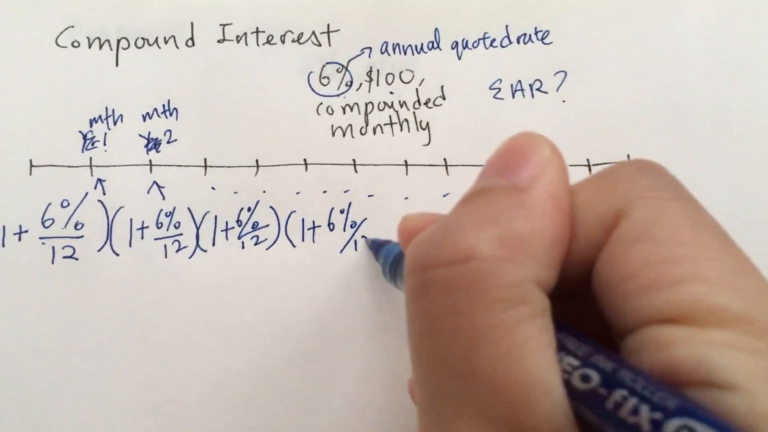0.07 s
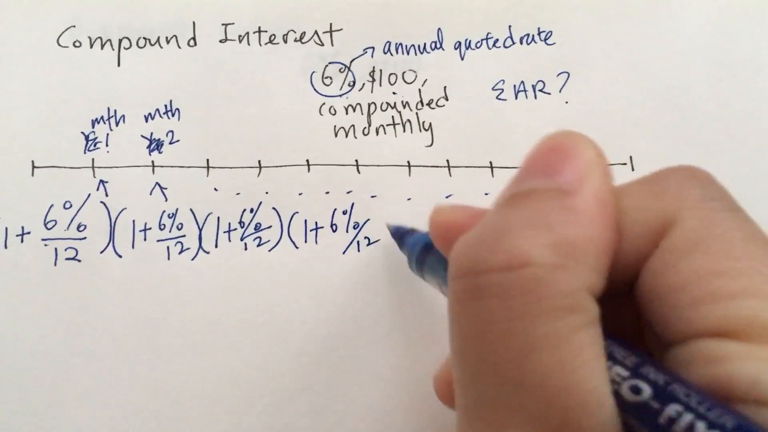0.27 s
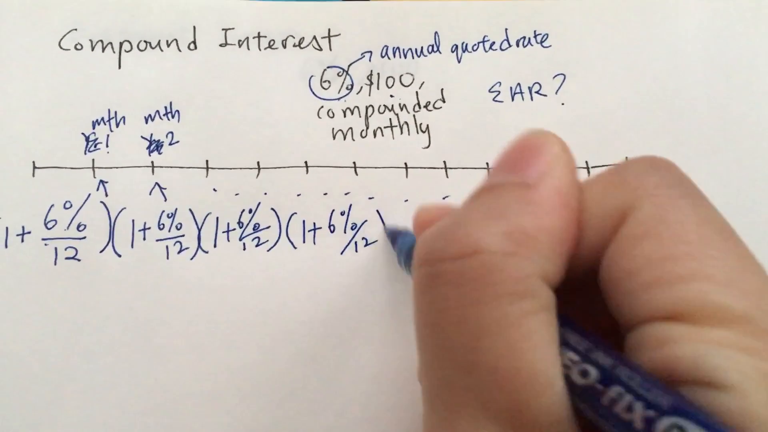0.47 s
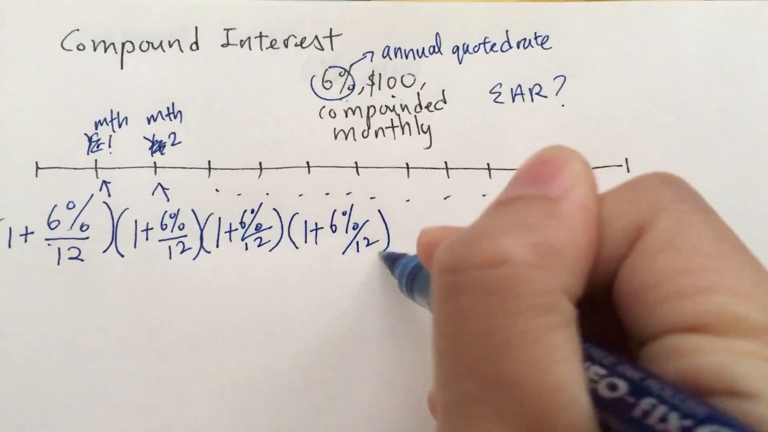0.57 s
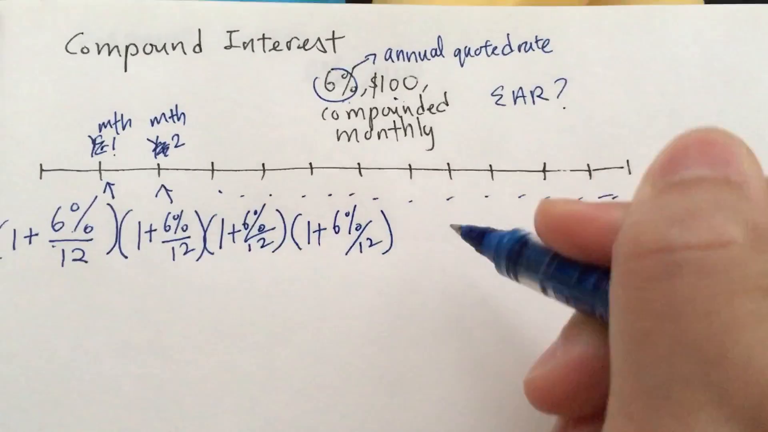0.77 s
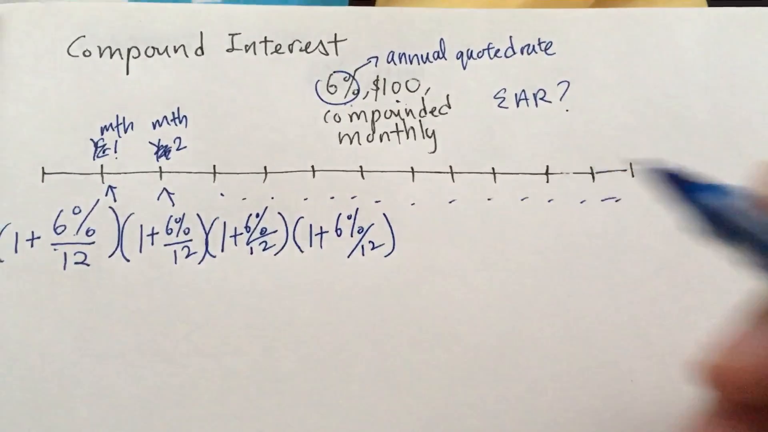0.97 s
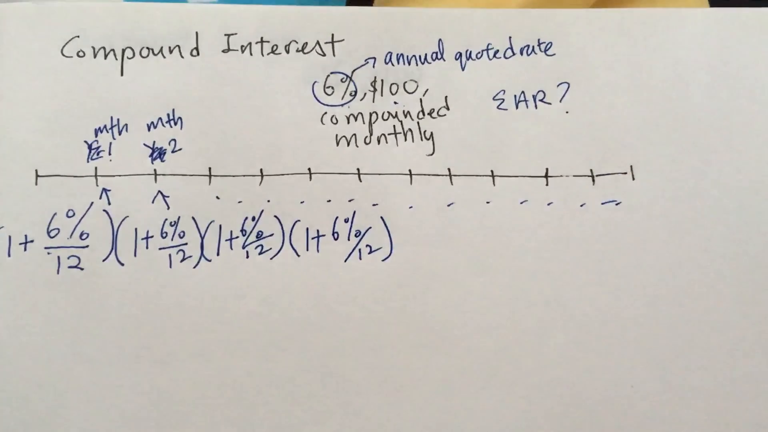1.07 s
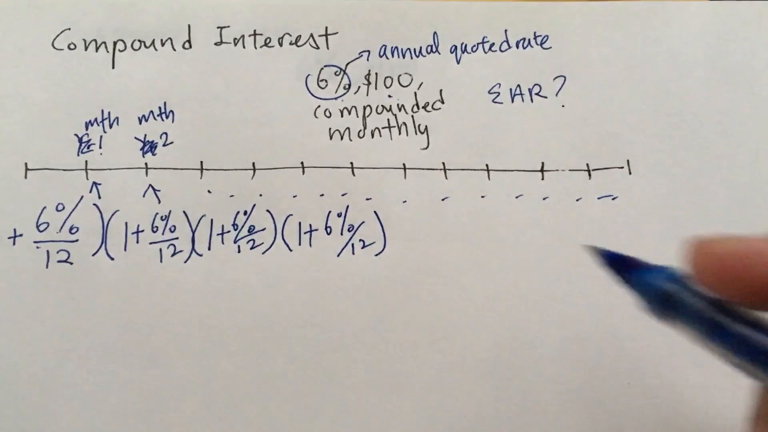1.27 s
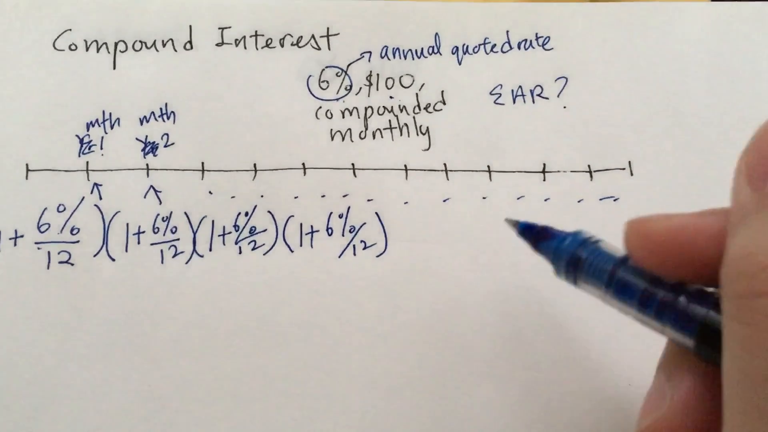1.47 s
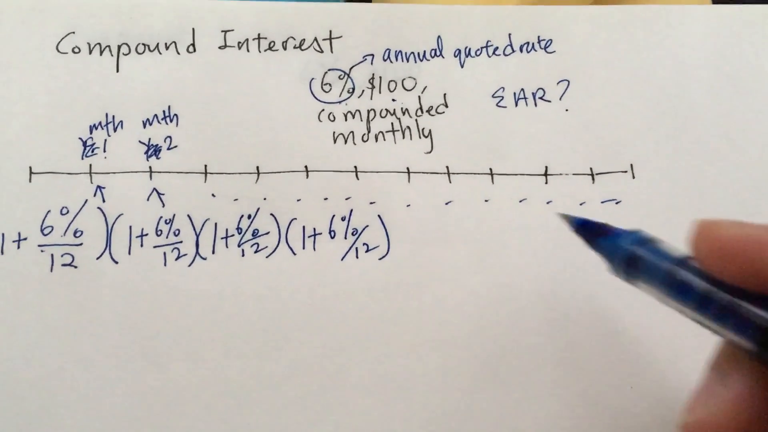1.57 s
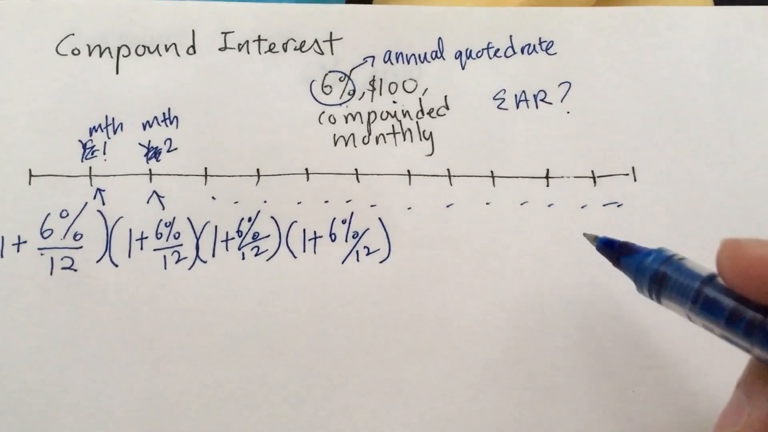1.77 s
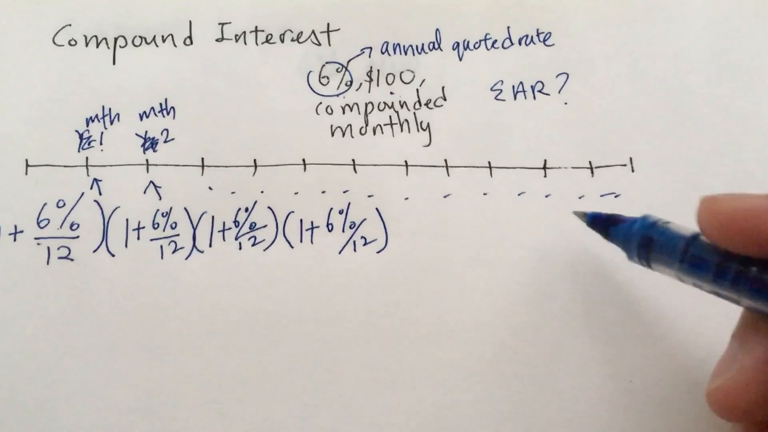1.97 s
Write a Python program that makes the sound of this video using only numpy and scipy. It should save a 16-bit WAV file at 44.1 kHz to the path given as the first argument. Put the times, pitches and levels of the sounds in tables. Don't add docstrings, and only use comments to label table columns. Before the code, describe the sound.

A fine pen writes on paper on a desk, heard close: faint short scratches from 0 to 0.35 s, then a bright tick at 0.45 and the hardest, shrillest stroke around 0.5-0.65. From 0.7 to 2 s the hand slides off in soft hissing brushes, with dull wrist bumps near 0.9 and tiny ticks around 1.1, 1.3 and 1.5. Low machine hum and airy ventilation continue throughout.

```python
import sys
import numpy as np
from scipy import signal
from scipy.fft import rfft, irfft
from scipy.io import wavfile
from scipy.ndimage import uniform_filter1d

SR = 44100
rng = np.random.default_rng(int(sys.argv[2]) if len(sys.argv) > 2 else 0)


def nominal_scale(level):
    x = np.asarray(level, float) / 20
    return 10 ** x


def to_wav(sig):
    pcm = np.clip(np.atleast_2d(sig), -1, 1) * 32767
    pcm = np.round(pcm).astype(np.int16)
    wavfile.write(sys.argv[1], SR, pcm.T)


N = 88905

# start in seconds, length in seconds, level in dB, desk drum in dB, edge hiss in dB.
PEN_STROKES = [
    (-.04, 0.062, -67, 12, -3.5),
    (0.088, 0.014, -72, 5, -13),
    (0.144, 0.042, -68.5, 5.5, -7.5),
    (0.16, 0.074, -67, 6, -15),
    (0.265, 0.067, -63, -6, -9),
    (0.303, 0.099, -74, -10, -16),
    (0.496, 0.042, -62, 2.5, -25),
    (.508, 0.064, -51.5, 0, -18),
    (.545, .06, -56, 3.5, -15),
    (0.569, 0.096, -64.5, 1, -6.5),
]
# centre in Hz, width in Hz, level in dB.
TIP_RESONANCES = [(3590, 890, -8), (4650, 500, -13.5), (6120, 1570, -2.5), (6870, 720, -1),
                  (7970, 1600, -3.5)]
# centre in Hz, width in Hz, level in dB.
EDGE_HISS = [(9400, 3300, 0), (11000, 2000, 0)]
# centre in Hz, width in Hz, level in dB.
SHRILL_BANDS = [(11600, 1600, -1), (13600, 1400, -11), (15000, 1500, -13)]
# centre in Hz, width in Hz, level in dB.
DESK_MODES = [(692, 98, -0.5), (818, 78, -1.5), (898, 56, -0.5), (1440, 1700, -13), (2000, 770, -11.5)]
# pitch in Hz, rms level in dB.
MACHINES = [(46.8, -45.6), (48.55, -55)]
# frequency in Hz, level in dB per Hz.
RUMBLE_COLOUR = [(22, -16.5), (35, -13), (47, -2), (62, 7), (90, 1.5), (115, -11.5), (160, -5.5),
                 (340, -5.5)]
# frequency in Hz, level in dB per Hz.
AIR_COLOUR = [(290, -28), (500, -3.5), (1040, -8), (2050, -11.5), (2240, -13), (3210, -18.5), (5020, -24),
              (8200, -25.5), (15700, -32.5)]
# centre in Hz, width in Hz, rms level in dB.
DUCT_MODES = [(89, 24, -65.5), (146.8, 10.2, -69.5), (172, 6.5, -70.5), (222.3, 16, -75), (331, 38, -73),
              (395.5, 14, -75), (580.7, 10, -79.5), (824, 14.3, -81)]
# middle in seconds, low edge in Hz, high edge in Hz, level in dB.
WIDE_HISS = [
    (.047, 8800, 10300, -86),
    (.047, 12300, 15200, -84),
    (.768, 5000, 6400, -70),
    (.768, 8800, 11700, -70),
    (.768, 13800, 15700, -76),
]
# time in seconds, peak in dB, top of its band in Hz.
TIP_TOUCHES = [
    (0.454, -43.5, 13500),
    (.192, -56, 10000),
    (.602, -52, 11000),
    (1.098, -54, 10000),
    (1.132, -52, 10000),
    (1.326, -52, 10500),
    (1.539, -48, 9000),
]
# time in seconds, pitch in Hz, level in dB, T60 in seconds.
WRIST_BUMPS = [
    (1.999, 522, -48.5, 0.24),
    (.88, 460, -59, .2),
    (.87, 109.5, -47.5, .25),
    (0.42, 148, -54.5, 0.36),
    (.93, 89, -52, .25),
    (1.27, 260, -58, 0.25),
    (2.5, 165, -59, .3),
]
# start in seconds, length in seconds, level in dB, high and low sheet ring in dB.
HAND_SLIDES = [(0.694, 0.16, -61, -0.5, -8), (0.748, 0.2, -65.5, -13, -10), (0.864, 0.1, -63, -3, -7.5),
               (0.902, .13, -62, -11, -9), (0.984, 0.18, -72, -22, -25), (1.065, 0.18, -65, -15, -9),
               (1.136, 0.22, -72.5, -14, -7), (1.242, 0.19, -64.5, -8.5, -2), (1.29, 0.25, -59.5, -17, -26),
               (1.545, 0.16, -64, -7.5, -4.5), (1.633, 0.15, -65.5, -5.5, -0.5),
               (1.767, 0.21, -74.5, -20, -8), (1.851, 0.23, -67.5, -15, -10)]
# start in seconds, length in seconds, level in dB.
PALM_RUBS = [
    (0.692, 0.2, -71),
    (0.882, 0.15, -70.5),
    (1.27, 0.23, -65),
    (1.407, 0.18, -69.5),
    (1.594, 0.18, -71),
    (1.893, 0.17, -77),
]
# start in seconds, length in seconds, level in dB.
FINGER_TRAILS = [
    (0.79, .13, -72),
    (.94, .14, -71),
    (1.028, 0.13, -72.5),
    (1.08, 0.16, -68.5),
    (1.3, 0.12, -75),
    (1.842, 0.19, -77),
]
# frequency in Hz, level in dB per Hz.
SKIN_COLOUR = [(1650, -31), (2800, -11.5), (3740, -2.5), (5090, -0.5), (6800, -4), (7250, -4.5), (8680, 0),
               (10200, -3.5), (15700, -11)]
# centre in Hz, width in Hz, level in dB.
HIGH_SHEET_RING = [(6570, 820, 15), (5600, 410, 0)]
# centre in Hz, width in Hz, level in dB.
LOW_SHEET_RING = [(3560, 680, 4), (4500, 230, 10.5)]
# centre in Hz, width in Hz, level in dB.
PALM_BANDS = [(2180, 540, -3.5), (1300, 600, -3.5)]
# centre in Hz, width in Hz, level in dB.
FINGERTIP_BANDS = [(8650, 2600, 1), (11200, 970, -6)]
# centre in Hz, width in Hz, depth from 0 to 1.
REFLECTION_DIPS = [(10400, 600, .45), (4950, 300, .25)]

STROKE_SHARPNESS, STROKE_SKEW = 1.4, 0.89
SLIDE_SHARPNESS, SLIDE_SKEW = 1.92, 0.88
PEN_FIBRES_PER_S, SKIN_FIBRES_PER_S = 9000, 16000
SHRILL_DB, SHRILL_POWER = -12, 1.2
TOUCH_T60_S, TOUCH_TAIL_DB, TOUCH_LOW_HZ = 0.035, -17, 3500
BUMP_RISE_S = 0.004
WIDE_HISS_S = 0.04
HUM_SWELL_S, HUM_WAVER_DB = 1.613, 0.5
RUMBLE_DB, AIR_DB = -56.5, -66
LOW_DUCT_FADE_DB_PER_S = -3
TOP_CUT_HZ = 16600


def rms_one(x):
    return x / np.sqrt(np.mean(x ** 2) + 1e-20)


def drift(rate):
    r = np.exp(-2 * np.pi * rate / SR)
    wander = signal.lfilter([1], [1, -2 * r, r * r], rng.standard_normal(N + SR))
    return rms_one(wander[SR:])


def coloured(x, points, edge_db=-24):
    first_hz, first_db = points[0]
    hz, db = np.transpose([(first_hz * 0.23, first_db + edge_db), *points])
    f = np.maximum(np.fft.rfftfreq(len(x), 1 / SR), 1)
    gain = nominal_scale(np.interp(np.log(f), np.log(hz), db, right=-90))
    return rms_one(irfft(rfft(x) * gain, len(x)))


def resonant(x, peaks):
    out = 0
    for k, (hz, width, db) in enumerate(peaks):
        r = np.exp(-np.pi * width / SR)
        zeros = np.array([1, 0, -1]) * (1 - r * r) / 2
        poles = [1, -2 * r * np.cos(2 * np.pi * hz / SR), r * r]
        out = out + (-1) ** k * nominal_scale(db) * signal.lfilter(zeros, poles, x)
    return out


def twice(x, peaks):
    out = 0
    for k, (hz, width, db) in enumerate(peaks):
        once = resonant(x, [(hz, width, db)])
        out = out + (-1) ** k * resonant(once, [(hz, width, 0)])
    return rms_one(out)


def bandpass(x, order, low_hz, high_hz):
    return signal.sosfilt(signal.butter(order, [low_hz, high_hz], "band", fs=SR, output="sos"), x)


def fibres(per_s, spread_db):
    size = nominal_scale(spread_db * np.minimum(rng.exponential(1, N), 5)) * rng.choice([-1, 1], N)
    return size * (rng.random(N) < per_s / SR) + 1e-18


def swell(start, length, sharpness, skew):
    share = np.clip((np.arange(N) / SR - start) / length, 0, 1)
    return np.sin(np.pi * share ** skew).clip(0) ** sharpness


def pen():
    tip, desk, edge = 0, 0, 0
    for start, length, db, desk_db, edge_db in PEN_STROKES:
        speed = nominal_scale(db) * swell(start, length, STROKE_SHARPNESS, STROKE_SKEW)
        tip = tip + speed
        desk = desk + nominal_scale(desk_db) * speed
        edge = edge + nominal_scale(edge_db) * speed
    catch = nominal_scale(1.6 * drift(300))
    grain = fibres(PEN_FIBRES_PER_S, 2.2) * catch
    other_grain = fibres(PEN_FIBRES_PER_S, 2.2) * catch
    shrill = nominal_scale(SHRILL_DB) * tip.max() * (tip / tip.max()) ** SHRILL_POWER
    scratch = tip * twice(grain, TIP_RESONANCES) + shrill * twice(grain, SHRILL_BANDS)
    drum = desk * rms_one(resonant(other_grain, DESK_MODES))
    return scratch + edge * twice(other_grain, EDGE_HISS) + drum


def hum():
    t = np.arange(N) / SR - HUM_SWELL_S
    out = 0
    for hz, db in MACHINES:
        level = np.sqrt(2) * nominal_scale(db + HUM_WAVER_DB * drift(2.1))
        out = out + level * np.cos(2 * np.pi * hz * t)
    return out


def room():
    closing_slope = [(470, -16.5), (700, -42.5)]  # Hz, dB per Hz
    rumble = coloured(rng.standard_normal(N), RUMBLE_COLOUR + closing_slope)
    air = coloured(rng.standard_normal(N), AIR_COLOUR, edge_db=-6)
    return nominal_scale(RUMBLE_DB) * rumble + nominal_scale(AIR_DB + 1.6 * drift(4.5)) * air


def ducts():
    tones = []
    for hz, width, db in DUCT_MODES:
        noise = rng.standard_normal(N + SR)
        tones.append(nominal_scale(db) * twice(noise, [(hz, width, 0)])[SR:])
    fade = nominal_scale(LOW_DUCT_FADE_DB_PER_S * (np.arange(N) / SR - 0.5))
    return tones[0] * fade + sum(tones[1:])


def wide_hiss():
    noise = rng.standard_normal(N)
    out = 0
    for middle, low_hz, high_hz, db in WIDE_HISS:
        shape = swell(middle - WIDE_HISS_S / 2, WIDE_HISS_S, 1.3, 0.86)
        out = out + nominal_scale(db) * shape * rms_one(bandpass(noise, 6, low_hz, high_hz))
    return out


def touches():
    out = np.zeros(N + SR)
    age = np.arange(2000) / SR
    for s, db, top_hz in TIP_TOUCHES:
        tail = uniform_filter1d(rng.standard_normal(len(age)), size=2)
        tick = tail * nominal_scale(TOUCH_TAIL_DB - 60 * age / TOUCH_T60_S)
        tick[0] = -2
        at = int(s * SR)
        out[at:at + len(age)] += nominal_scale(db) * bandpass(tick, 4, TOUCH_LOW_HZ, top_hz)
    return out[:N]


def bumps():
    t = np.arange(N) / SR
    out = 0
    for s, hz, db, t60 in WRIST_BUMPS:
        age = np.maximum(t - s, 0)
        push = 1 - np.exp(-age / BUMP_RISE_S)
        out = out + nominal_scale(db - 60 * age / t60) * push * np.sin(2 * np.pi * hz * age)
    return out


def hand():
    grain = fibres(SKIN_FIBRES_PER_S, 0.97) * nominal_scale(0.65 * drift(60))
    hiss = coloured(grain, SKIN_COLOUR)
    high_ring = rms_one(resonant(grain, HIGH_SHEET_RING))
    low_ring = rms_one(resonant(grain, LOW_SHEET_RING))
    slides = 0
    for start, length, db, high_db, low_db in HAND_SLIDES:
        speed = nominal_scale(db) * swell(start, length, SLIDE_SHARPNESS, SLIDE_SKEW)
        slides = slides + speed * (hiss + nominal_scale(high_db) * high_ring + nominal_scale(low_db) * low_ring)
    palm = sum(nominal_scale(db) * swell(start, length, SLIDE_SHARPNESS, SLIDE_SKEW) for start, length, db in PALM_RUBS)
    tips = sum(nominal_scale(db) * swell(start, length, 0.94, 0.88) for start, length, db in FINGER_TRAILS)
    trails = tips * twice(fibres(SKIN_FIBRES_PER_S, 1.5), FINGERTIP_BANDS)
    rubs = palm * rms_one(resonant(rng.standard_normal(N), PALM_BANDS))
    return slides + trails + rubs


def scene():
    near = pen() + touches() + hand()
    for hz, width, depth in REFLECTION_DIPS:
        near = near - depth * resonant(near, [(hz, width, 0)])
    mid = near + bumps() + hum() + room() + ducts()
    side = wide_hiss()
    return np.array([mid + side, mid - side])


def band_limit(x):
    return signal.sosfilt(signal.butter(12, 15830, fs=SR, output="sos"), x)


def record(dry):
    low_pass = signal.cheby2(12, 30, TOP_CUT_HZ, fs=SR, output="sos")
    mix = signal.sosfiltfilt(low_pass, dry)
    return band_limit(mix)


dry = scene()
out = record(dry)
to_wav(out)
```